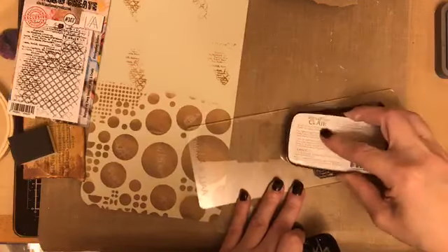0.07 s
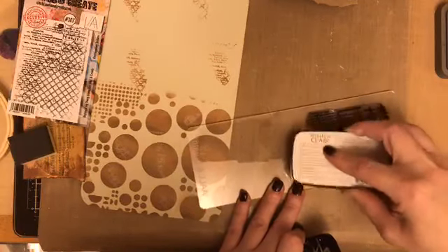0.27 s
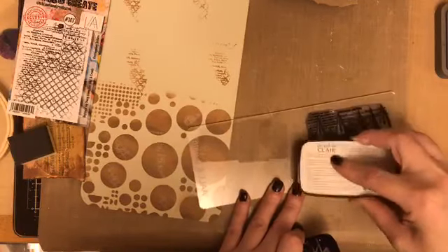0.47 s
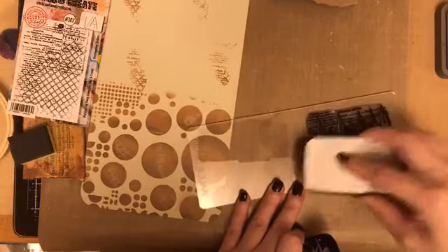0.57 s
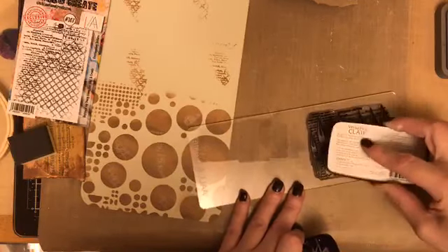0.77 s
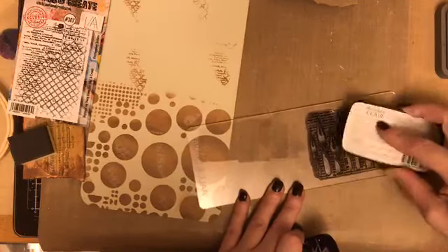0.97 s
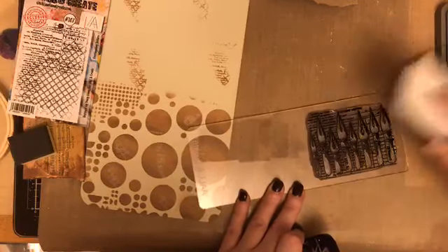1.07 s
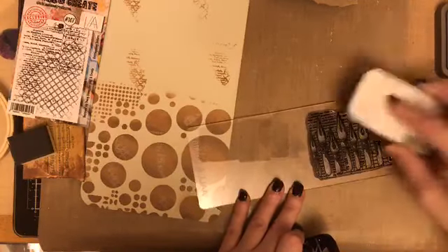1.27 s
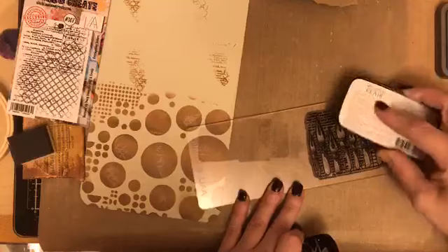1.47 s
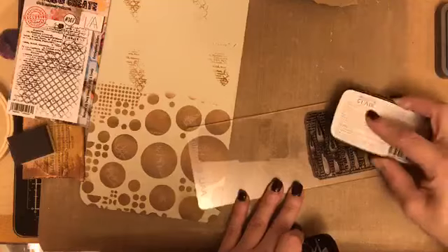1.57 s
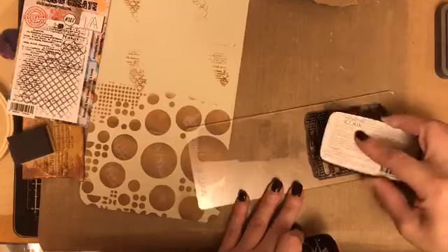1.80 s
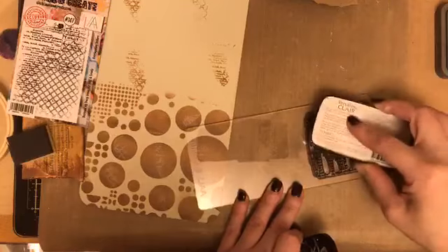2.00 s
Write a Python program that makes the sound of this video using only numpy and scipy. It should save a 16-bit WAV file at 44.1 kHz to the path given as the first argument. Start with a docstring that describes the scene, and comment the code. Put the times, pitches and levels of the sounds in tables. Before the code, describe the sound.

Light quick pats of an ink pad on a stamp, with faint sticky peels between, close up

```python
"""Over the faint rumble of a small quiet room, a plastic ink pad is patted nine times onto a clear stamp.
Each pat on the craft table is a felt scrunch as one edge lands, a clack as the case comes flat,
and a slow shudder of the table: shaped noise, one click and dying sines, with the room behind them.
Between pats the inky felt peels off with a faint tacky hiss, swells of uneven noise,
and the case ticks in the fingers, tiny noise bursts with a thin ring."""
import sys
import numpy as np
from scipy import signal
from scipy.fft import rfft, irfft
from scipy.io import wavfile

SR = 44100
rng = np.random.default_rng(int(sys.argv[2]) if len(sys.argv) > 2 else 0)


def transcribe(signal):
    """Save signal, clipped to [-1, 1], as a 16-bit WAV file at the path in sys.argv[1]."""
    frames = np.atleast_2d(signal).T
    limited = np.clip(frames, -1, 1)
    pcm = np.round(limited * 32767).astype(np.int16)
    wavfile.write(sys.argv[1], SR, pcm)


N = 90052  # length in samples

# The pats. Each row: moment of the clack in seconds, overall level in dB, hollow pitch in Hz,
# hollow, knock, snap and treble levels in dB, how much earlier the edge lands in seconds, edge level in dB,
# how much later the case settles in seconds, settle, table thump and table sway levels in dB.
PAT_ROWS = [(0.0415, -6.5, 297, -6.5, -5, -2.5, 3, 0.0044, 0, 0.0009, -2, -0.5, -3.5),
            (0.2649, -8, 375, 7.5, 1.5, 0, 4.5, .0030, -6, 0.00064, 3.5, 2.5, -1),
            (0.4713, -2, 370, 3, -0.5, -5.5, 0, .0028, -3, .0014, 0, -2, -4),
            (0.6961, -2, 424, 11.5, 2, 4.5, 3, 0.0031, -4.5, 0.00033, -0.5, 3, 0),
            (0.9108, -2.5, 250, 4.5, 1, -1.5, 0.5, 0.0034, 0, 0.0033, -1, 3, -4),
            (1.3506, 0, 279, 3.5, -1, -0.5, -1, 0.0024, -5, .0027, -5, 3, -0.5),
            (1.5789, -2.5, 300, -2.5, 2, -1.5, 1, .0040, 1, 0.0012, -4, 4, -1.5),
            (1.796, 0, 420, -10, -5, -4.5, 0, .0040, 2.5, 0.00058, 0.5, 5, 0),
            (2.024, 5.5, 350, 1, 2, -5.5, -2, 0.0029, 1.5, 0.00053, -1, 4, 7)]

# Centres of the colour bands of the pats and the small sounds, in Hz
BASS_HZ, KNOCK_HZ, MID_HZ, SNAP_HZ, TREBLE_HZ = 170, 655, 1340, 2450, 5600


def amp(db):
    """Decibels to gain."""
    return 10 ** (np.asarray(db) / 20)


def unit(x):
    """Scales to energy one."""
    return x / np.sqrt(np.sum(x ** 2) + 1e-20)


def read(points, hz):
    """Reads a table along a log-frequency axis."""
    f, value = np.transpose(points)
    return np.interp(np.log(hz + 1), np.log(f + 1), value)


def add(mix, s, sound):
    """Adds a sound to the mix at time s."""
    part = mix[max(round(s * SR), 0):][:len(sound)]
    part += sound[:len(part)]


def colour(x, points, size=4096):
    """Causal minimum-phase filter with the given (Hz, dB) outline."""
    hz = abs(np.fft.fftfreq(size, 1 / SR))
    log_gain = np.log(amp(read(points, hz)))
    spectrum = np.exp(np.conj(signal.hilbert(log_gain)))
    taps = np.fft.ifft(spectrum).real[:size // 2]
    return signal.fftconvolve(x, taps)[:len(x)]


def ring(modes, length):
    """Dying sines, one per (Hz, dB, t60 s) mode, neighbours starting in opposite directions."""
    t = np.arange(length) / SR
    total = np.zeros(length)
    for k, (hz, db, t60) in enumerate(modes):
        direction = (-1) ** (k + 1)
        total += direction * amp(db - 60 * t / t60) * np.sin(2 * np.pi * hz * t)
    return total


def grit(envelope, low_hz=710):
    """Many tiny contacts: noise under an envelope, high-passed at low_hz, energy one."""
    high = signal.butter(1, low_hz, "high", fs=SR)
    return unit(signal.lfilter(*high, envelope * rng.standard_normal(len(envelope))))


def uneven(length, spread_db):
    """Random sizes: mostly small, a few large."""
    return amp(spread_db * np.minimum(rng.exponential(1, length), 5))


def air():
    """Steady room tone: still air and building rumble, as noise with a fixed spectrum."""
    # Each row: frequency in Hz, relative density in dB per Hz.
    air_spectrum = [(15, -7.5), (26, -4.5), (37, 1), (55, -9.5), (78, -3.5), (120, -29.5), (200, -18.5),
                    (450, -32), (640, -30.5), (850, -38), (1500, -35), (2200, -39), (6000, -43),
                    (11000, -52), (16000, -47.5)]
    level_db = -56  # RMS
    gain = amp(read(air_spectrum, np.fft.rfftfreq(N, 1 / SR)))
    noise = irfft(rfft(rng.standard_normal(N)) * gain, N)
    return amp(level_db) * np.sqrt(N) * unit(noise)


def echoes():
    """Quick reflections off the table, and a room tail that dies at its own rate in each band."""
    # Decay of the room. Each row: frequency in Hz, t60 in seconds.
    room_decay = [(150, 0.15), (400, 0.16), (1000, 0.14), (2800, 0.17), (7000, 0.16), (15000, 0.15)]
    # Colour of the tail. Each row: frequency in Hz, level in dB.
    room_colour = [(100, -6), (400, 9.5), (1500, -3.5), (4000, -0.5), (8000, 0.5), (15000, 3.5)]
    scatter_db, room_db, room_rise_s = 3.5, 1.5, 0.002
    near_db, near_s = -0.5, 0.004
    t = np.arange(SR // 2) / SR
    scattered = uneven(len(t), scatter_db) * rng.standard_normal(len(t))
    hz, when, bands = signal.stft(scattered, SR, nperseg=256)
    bands = bands * amp(-60 * when / read(room_decay, hz)[:, None])
    tail = signal.istft(bands, SR)[1][:len(t)]
    tail = tail * (1 - np.exp(-t / room_rise_s))
    near = grit(np.exp(-t / near_s) * np.sqrt(t))
    return amp(room_db) * colour(unit(tail), room_colour) + amp(near_db) * near


def pat(s, db, hollow_hz, hollow_db, knock_db, snap_db, treble_db,
        edge_s, edge_db, settle_s, settle_db, *_):
    """One edge scrunches down, the case clacks flat and settles, and the parts and the room ring."""
    # Colour of a clack. Each row: frequency in Hz, level in dB.
    clack_colour = [(100, -27.5), (250, 5), (450, -9.5), (630, 8), (790, -0.5), (1000, 2.5), (1550, 6),
                    (2300, -2), (4000, -8.5), (6800, -12.5), (9500, -19), (15500, -21)]
    # Rings of the case, the stamp block and the table top.
    # Each row: frequency in Hz, level in dB, t60 in seconds, limited to longest_t60.
    part_rings = [(266.5, -35.5, 0.076), (365.8, -32.5, 0.098), (426, -38, .1), (544, -45.5, 0.089),
                  (606, -38, 0.082), (660.8, -28, 0.087), (924, -27, 0.052), (999, -42.5, 0.28),
                  (1537, -27, 0.046), (1682, -41.5, 0.12), (2032, -54, 0.33), (2470, -30, 0.041),
                  (2950, -42, 0.26), (3210, -47.5, 0.048), (6470, -33.5, 0.017)]
    longest_t60 = 0.17  # longest t60 of any part ring, in seconds
    clack_db, ring_db, click_db = 1, -4.5, 0.5
    crunch_db, crunch_s, edge_low_hz = -10, 0.001, 3300

    t = np.arange(SR // 2) / SR
    scrunch = grit((t < edge_s) * np.sqrt(t), edge_low_hz)  # grows until the case is flat
    crunch = np.exp(-t / crunch_s)
    blow = amp(edge_db) * scrunch
    add(blow, edge_s, amp([click_db]))  # a single-sample click
    add(blow, edge_s, amp(crunch_db) * grit(crunch) + echoes())
    add(blow, edge_s + settle_s, amp(settle_db) * grit(crunch))

    sound = amp(clack_db) * colour(blow, clack_colour)
    limited = [(hz, level, min(t60, longest_t60)) for hz, level, t60 in part_rings]
    add(sound, edge_s, amp(ring_db) * ring(limited, len(t)))
    landing = [(BASS_HZ, 0), (hollow_hz, hollow_db), (KNOCK_HZ, knock_db),
               (MID_HZ, 0), (SNAP_HZ, snap_db), (TREBLE_HZ, treble_db)]
    return s - edge_s, amp(db) * colour(sound, landing)


def table():
    """Every pat thumps the table top through the soft felt and sets the whole table swaying."""
    # Slow modes of the table. Each row: frequency in Hz, level in dB, t60 in seconds.
    sway_modes = [(34.96, -31.5, 0.81), (41.7, -29, 0.17)]
    # Quicker modes of the table top. Each row: frequency in Hz, level in dB, t60 in seconds.
    thump_modes = [(74.3, -29, 0.14), (77.7, -43.5, 0.28), (103.5, -49.5, 0.32), (155.4, -40, .13)]
    thump_lag_s, thump_rise_s, sway_lag_s = 0.0014, 0.0063, 0.0077
    cushion = 1 - np.exp(-np.arange(N) / SR / thump_rise_s)  # the felt softens the onset
    thump = cushion * ring(thump_modes, N)
    sway = ring(sway_modes, N)
    out = np.zeros(N)
    for s, *_, thump_db, sway_db in PAT_ROWS:
        add(out, s + thump_lag_s, amp(thump_db) * thump)
        add(out, s + sway_lag_s, amp(sway_db) * sway)
    return out


def small_sound(contact, db, hollow_db, treble_db):
    """A peel or a tick, coloured by the case of the pad."""
    # Colour shared by peels and ticks. Each row: frequency in Hz, level in dB.
    peel_colour = [(200, -27), (700, -1), (1500, 2), (2600, -4), (4500, -1.5), (9000, -8.5), (15500, -13.5)]
    hollow_hz = 350
    case = [(hollow_hz, hollow_db), (MID_HZ, 0), (TREBLE_HZ, treble_db)]
    return amp(db) * colour(colour(contact, peel_colour), case)


def peel(s, db, swell_s, treble_db, grain_db=5, hollow_db=2):
    """Threads of ink snap in a short swell as the felt lifts."""
    room_db = -7.5
    t = np.arange(SR // 2) / SR
    lead = np.pi * swell_s  # from the start to the height of the swell
    swell = np.exp(-0.5 * ((t - lead) / swell_s) ** 2)
    snaps = grit(uneven(len(t), grain_db) * swell)
    room = amp(room_db) * signal.fftconvolve(snaps, echoes())[:len(t)]
    return s - lead, small_sound(snaps + room, db, hollow_db, treble_db)


def tick(s, db, hollow_db, treble_db):
    """One tiny click, the ring of the thin case wall and the echoes."""
    # The thin wall of the case. Each row: frequency in Hz, level in dB, t60 in seconds.
    wall_ring = [(2036, -33.5, 0.046)]
    decay_s, snap_db, room_db = 0.0017, -6, -5.5
    click = grit(np.exp(-np.arange(SR // 2) / SR / decay_s))
    add(click, 0, amp([snap_db]))  # a single-sample snap
    add(click, 0, ring(wall_ring, len(click)))
    return s, small_sound(click + amp(room_db) * echoes(), db, hollow_db, treble_db)


def scene():
    """Pats, peels and ticks over the shaking table and the room tone."""
    # The felt peels off the stamp.
    # Each row: height of the swell in seconds, level in dB, swell width in seconds, treble in dB.
    peel_rows = [(0.15, -53, 0.007, 13), (0.189, -29, .014, -3), (.407, -23, 0.006, -2),
                 (0.593, -29.5, 0.0077, 1.5), (.614, -28, .008, -5), (0.836, -24.5, 0.0067, -6.5),
                 (1.034, -21.5, 0.011, -8.5), (1.494, -21.5, 0.0094, -9.5), (1.712, -20.5, .008, -11.5),
                 (1.916, -14.5, 0.0055, -5.5)]
    # Small ticks of the case and the tacky ink.
    # Each row: start in seconds, level in dB, hollow level in dB, treble in dB.
    tick_rows = [(0.156, -48, -14, 9), (.163, -39.5, 0, 5), (.191, -23.5, -10, -16), (0.316, -31, 3, 3),
                 (0.4047, -16, -20, -3), (.588, -36, 14, 3.5), (0.835, -29.5, 8, -10),
                 (1.150, -31.5, 11, -7.5), (1.19, -28, 19.5, -6), (1.204, -39, -2, -3),
                 (1.523, -35, -8, -1.5), (1.708, -21, -3, -16.5), (1.947, -31, 16, -5.5)]
    out = air() + table()
    for source, rows in ((pat, PAT_ROWS), (peel, peel_rows), (tick, tick_rows)):
        for row in rows:
            add(out, *source(*row))
    return out[None]


def record(dry):
    """The band limit of the recorder: a steep low-pass."""
    edge_hz = 16200
    taps = signal.firwin(511, edge_hz, window=("kaiser", 9), fs=SR)
    return signal.oaconvolve(dry, taps[None], "same")


dry = scene()
out = record(dry)
transcribe(out)
```